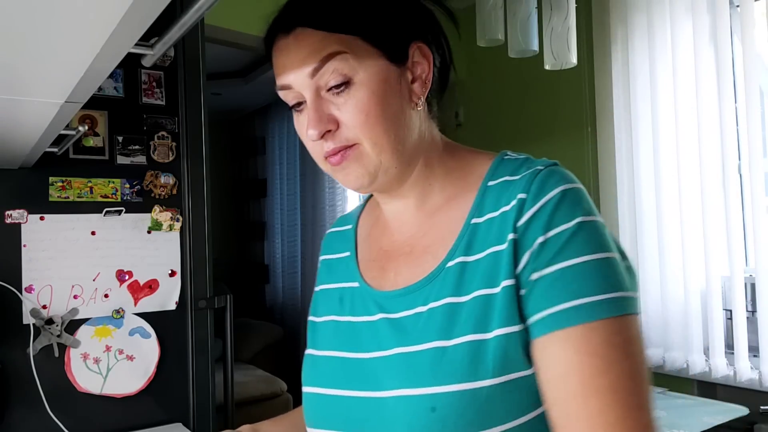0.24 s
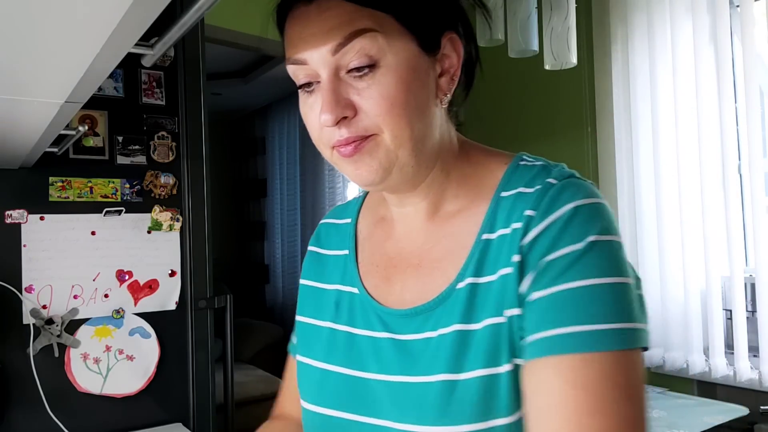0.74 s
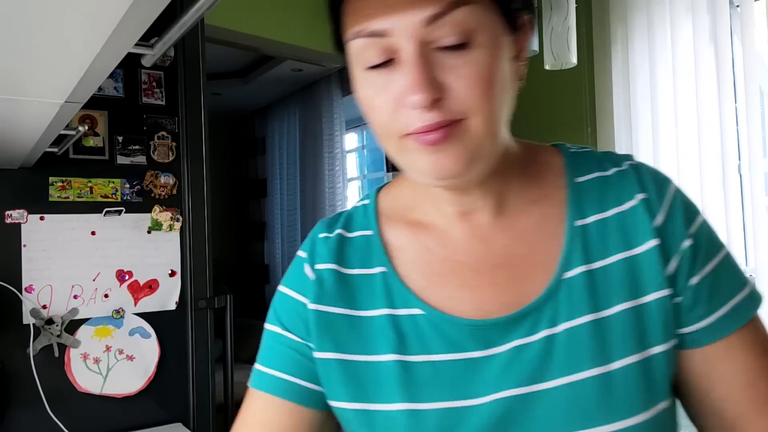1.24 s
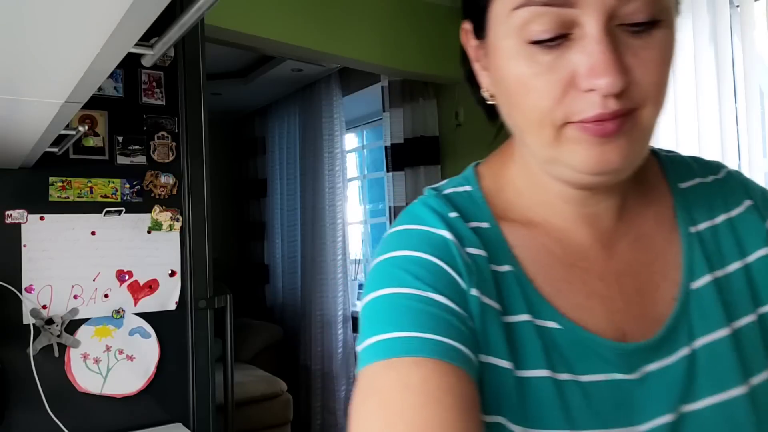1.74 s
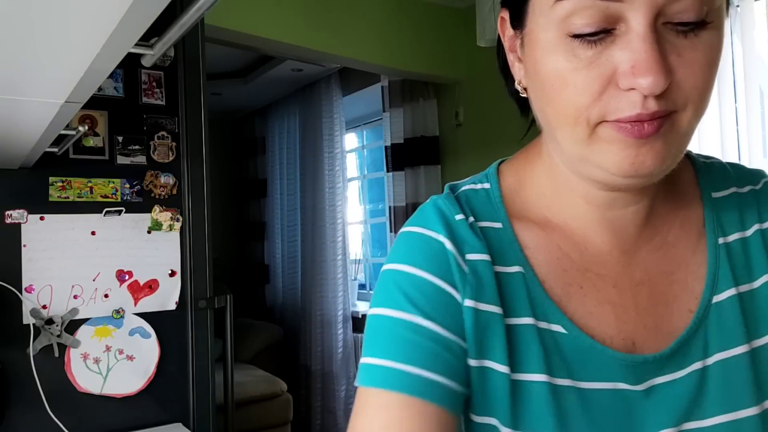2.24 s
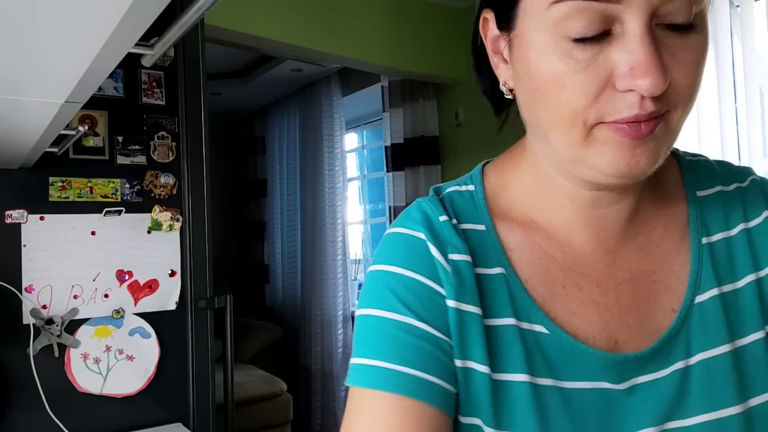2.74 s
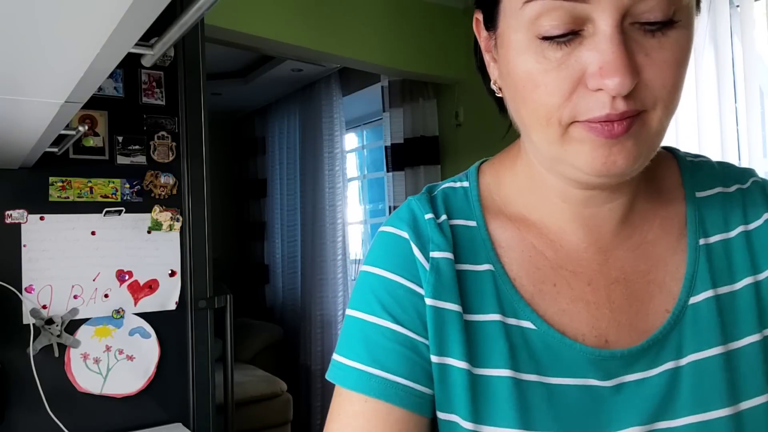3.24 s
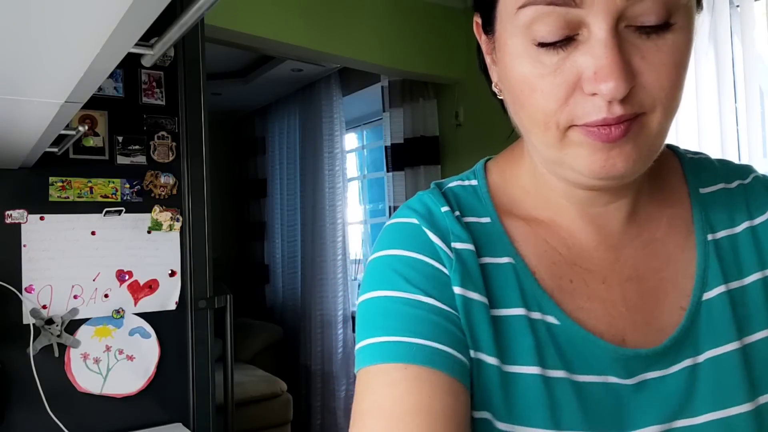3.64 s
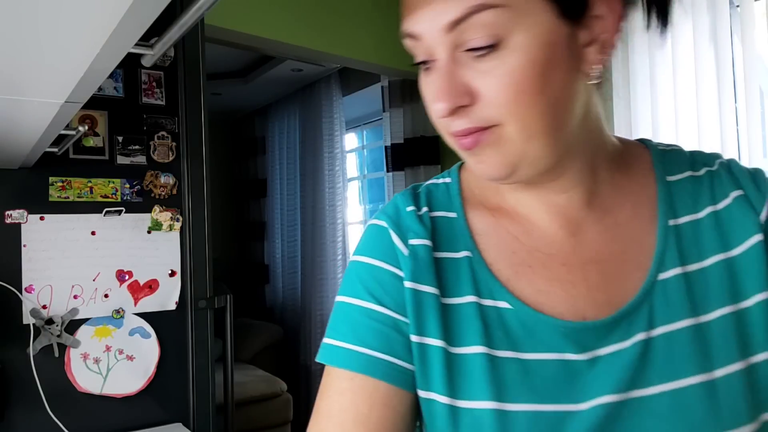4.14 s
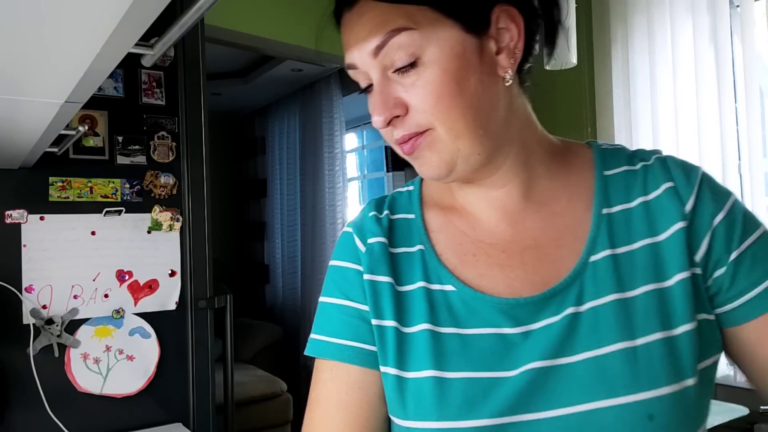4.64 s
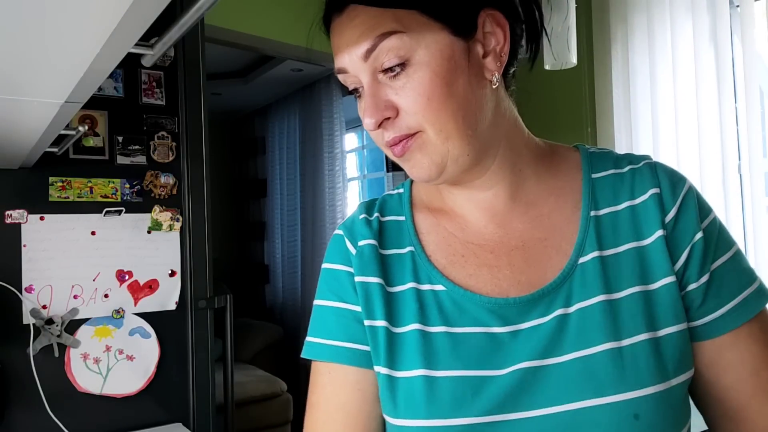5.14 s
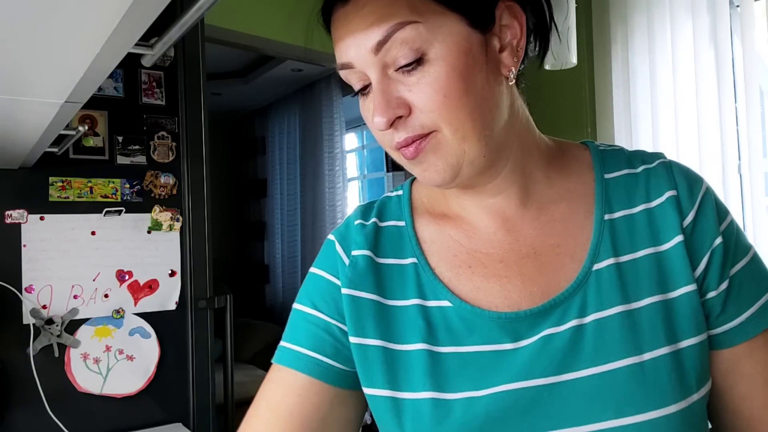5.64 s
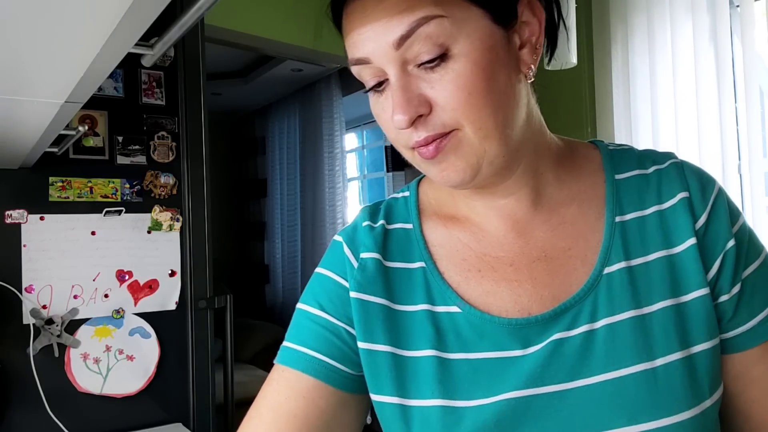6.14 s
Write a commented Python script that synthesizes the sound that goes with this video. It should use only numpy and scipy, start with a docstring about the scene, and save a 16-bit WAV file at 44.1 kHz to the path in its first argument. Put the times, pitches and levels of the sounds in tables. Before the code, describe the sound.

In a small, fairly dry kitchen, close up, soft knocks and brief slides on the worktop come first. A tap lever thumps and water hisses sharply into the sink, with metal clinking in the jet. The tap shuts with a thud, water tips out and drips fade. Cutlery is laid down, then a dish lands and rocks to rest over a faint low hum.

```python
"""In a small kitchen a tap is opened, hisses for two seconds into a sink and onto a held object, and is shut.
The water, spattering in the sink, is noise and random droplets, shaped by resonances, echoes and slow change.
Things slide and bump on the worktop (friction noise, damped modes), metal clinks, cutlery is laid down,
and a dish is put down and rocks. An appliance hums steadily (sines) over the quiet air of the room (noise)."""
import sys
import numpy as np
from scipy import signal
from scipy.fft import rfft, irfft, next_fast_len
from scipy.io import wavfile
from scipy.ndimage import map_coordinates

SR = 44100
rng = np.random.default_rng(int(sys.argv[2]) if len(sys.argv) > 2 else 0)


def generate_wav(sig):
    """Save sig (samples, or channels by samples) to the path in sys.argv[1] as 16-bit PCM at SR."""
    pcm = np.round(np.clip(np.atleast_2d(sig).T, -1, 1) * 32767).astype(np.int16)
    wavfile.write(sys.argv[1], SR, pcm)


N = 281358  # length [samples]


def amp(db):
    """Level law: decibels to amplitude gain."""
    return 10 ** (np.asarray(db) / 20)


def unit(x):
    """Normalisation of the signal power: rms 1."""
    return x / np.sqrt(np.mean(x ** 2) + 1e-20)


def along(points, hz):
    """Interpolation of (frequency [Hz], value) points on a logarithmic frequency axis."""
    f, v = np.transpose(points)
    return np.interp(np.log(hz + 1), np.log(f + 1), v)


def wobble(rate):
    """Slow random modulation: a smooth curve through rate random knots a second."""
    knots = rng.standard_normal(int(N * rate / SR) + 4)
    return map_coordinates(knots, [np.arange(N) * rate / SR])


def sides(pan_db):
    """Interaural level difference: left and right gains, positive to the left."""
    return amp(np.array([np.atleast_1d(pan_db), -np.atleast_1d(pan_db)]) / 2)


def since(s):
    """Elapsed time [s] since time s, 0 before it."""
    return np.maximum(np.arange(N) / SR - s, 0)


def onset(s, rise_s):
    """Smooth transition from 0 to 1 that starts at time s."""
    return 1 - np.exp(-(since(s) / rise_s) ** 2)


def swell(s, rise_s, hold_s, fall_db_per_s):
    """Envelope with exponential decay: rises at time s and dies away from hold_s later."""
    return onset(s, rise_s) * amp(-fall_db_per_s * since(s + hold_s))


def filtered(x, response):
    """Linear filtering: the spectrum of x times a response of frequency."""
    n = x.shape[-1]
    m = next_fast_len(n + 8192)
    return irfft(rfft(x, m) * response(np.fft.rfftfreq(m, 1 / SR)), m)[..., :n]


def band(x, centre_hz, octaves):
    """Band-pass filtering by a bell on the log-frequency axis."""
    return filtered(x, lambda hz: 1 / (1 + (np.log2((hz + 1) / centre_hz) / octaves) ** 4))


def resonant(x, modes):
    """Parallel resonators of (centre [Hz], width [Hz], level [dB]), alternating in sign."""
    def response(f):
        total = 0
        for k, (centre, width, db) in enumerate(modes):
            damping = 1j * f * width
            total = total + (-1) ** k * amp(db) * damping / (centre ** 2 - f ** 2 + damping)
        return total
    return filtered(x, response)


# correlation of the two channels: (frequency [Hz], left-right likeness [0 to 1])
LIKENESS = [(60, 0.92), (300, 1), (640, 0.02), (1400, 0.012), (3100, 0.024), (6800, 0.49), (15000, 1)]


def coloured(pair, spectrum):
    """Partial coherence: two unrelated signals become one stereo sound of rms 1, nearly mono in the bass."""
    turn = lambda hz: np.arccos(np.clip(along(LIKENESS, hz), -1, 1)) / 2
    mid_side = lambda hz: amp(along(spectrum, hz)) * [np.cos(turn(hz)), np.sin(turn(hz))]
    mid, side = filtered(pair, mid_side)
    return unit(np.array([mid + side, mid - side]))


def noise(size=N):
    """Random excitation: two unrelated white noises."""
    return rng.standard_normal((2, size))


def droplets(rate, spread_db, size=N):
    """Poisson-like impacts, rate a second, whose strengths spread randomly."""
    hit = rng.random(size) < rate / SR
    strength = amp(spread_db * np.minimum(rng.exponential(size=size), 4))
    return unit(noise(size) * hit * strength)


def patchy(pair, depth_db, width_hz=260, life=0.045):
    """Time-varying spectrum: random patches, width_hz wide and life [s] long, flare and fade."""
    hz, t, z = signal.stft(pair, SR, nperseg=1024)
    knots = rng.standard_normal((300, 600))
    grid = np.meshgrid(hz / width_hz, t / life, indexing="ij")
    field = map_coordinates(knots, grid, mode="wrap")
    return signal.istft(z * amp(depth_db * field), SR, nperseg=1024)[1][:, :pair.shape[1]]


def add(out, s, sound):
    """Superposition: mix a stereo sound in at time s."""
    i = max(round(s * SR), 0)
    out[:, i:i + sound.shape[1]] += sound[:, :N - i]


# reverberation of the kitchen: (frequency [Hz], t60 [s])
REVERBERATION = [(100, 0.21), (400, 0.28), (1500, 0.27), (8000, 0.23), (15000, 0.05)]


def in_room(x, wet_db):
    """Reverberation: a short sound followed by its own diffuse tail from the kitchen walls."""
    hz, t, z = signal.stft(noise(size=SR // 2), SR, nperseg=256)
    decay = amp(-60 * t / along(REVERBERATION, hz)[:, None])
    tail = signal.istft(z * decay, SR, nperseg=256)[1]
    tail = coloured(tail, [(100, 0), (10000, 0)])
    # the tail starts 4 ms after the direct sound
    tail = np.pad(tail / np.linalg.norm(tail[0]), ((0, 0), (SR // 250, 0)))
    return x + amp(wet_db) * signal.fftconvolve(x, tail, axes=1)[:, :x.shape[1]]


def strikes(rows, modes, rise_cycles, crack_db, crack_hz, crack_t60, wet_db, rattle, crack_octaves=0.88):
    """Modal synthesis: each blow rings damped modes at new strengths and begins with a crack of noise."""
    out, t = np.zeros((2, N)), np.arange(SR // 2) / SR
    hz, level, t60 = np.transpose(modes)[:, :, None]
    for s, db, bright, pan_db in rows:
        gains = amp(level + bright * np.log2(hz / hz.mean()) + rng.normal(0, 1, hz.shape))
        # short waves reach the two microphones out of step
        phase = noise(size=len(hz))[:, :, None] * np.minimum(hz / 2500, 2)
        # loose contact makes the ringing waver, fastest in the high modes
        knots = 4 * np.sqrt(hz) * t
        waver = np.array([map_coordinates(rng.standard_normal(300), [k]) for k in knots])
        phase = phase + rattle * waver
        rise = 1 - np.exp(-(t * hz / rise_cycles) ** 2)
        decay = amp(-60 * t / t60)
        ring = (gains * rise * decay * np.sin(2 * np.pi * hz * t + phase)).sum(1)
        crack = band(noise(size=len(t)) * amp(-60 * t / crack_t60), crack_hz, crack_octaves)
        crack = crack * (1 - np.exp(-(t * crack_hz / rise_cycles) ** 2))
        blow = in_room(ring / abs(ring).max() + amp(crack_db) * crack / abs(crack).max(), wet_db)
        # peak level is set before the left-right gains
        add(out, s, amp(db) * sides(pan_db) * blow / abs(blow).max())
    return out


# partials of the appliance: (frequency [Hz], level before drift and panning [dB rms])
HUM_PARTIALS = [(48.9, -86), (101, -69), (244.8, -48.5), (489.6, -75.5)]


def appliance_hum():
    """Additive synthesis: steady sines whose common timing and level drift slightly."""
    t = np.arange(N) / SR + 0.000092 * wobble(3.3)
    hum = sum(amp(db) * np.sqrt(2) * np.sin(2 * np.pi * hz * t) for hz, db in HUM_PARTIALS)
    return hum * amp(0.33 * wobble(2.83)) * sides(8.5)


# spectrum of the room air: (frequency [Hz], relative level [dB per Hz])
AIR_SPECTRUM = [(20, -10.5), (48, -1), (70, -13.5), (100, -12.5), (200, -13.5), (260, -11.5), (350, -10.5),
                (760, -28), (1500, -34.5), (5800, -39.5), (7200, -31), (8600, -31.5), (10000, -49.5),
                (12500, -56), (14000, -79)]
# stereo lean of the air: (frequency [Hz], left-right difference [dB])
AIR_LEAN = [(50, 3), (200, 5.5), (500, 5.5), (1500, -1), (8000, -1.5)]


def room_air():
    """Stationary broadband noise with a set spectrum and a stereo lean by frequency."""
    air = filtered(coloured(noise(), AIR_SPECTRUM), lambda hz: sides(along(AIR_LEAN, hz)))
    return amp(-55.5) * air


# deep blows on the cabinet: (time [s], peak level [dB], brightness [dB/octave], left-right difference [dB])
THUD_BLOWS = [(0.125, -35.5, -5, 3), (1.75, -36.5, 27, 5), (3.65, -32.5, 17, -3), (3.703, -24, -26, 2),
              (3.735, -28, -14, -1)]
# modes of the cabinet: (frequency [Hz], relative level [dB], t60 [s])
CABINET_MODES = [(44.7, 21, 0.084), (63, 3, 0.2), (85, 16.5, 0.31), (118, -45, 0.075)]


def thuds():
    """Low-frequency modes of the cabinet answer deep thuds."""
    return strikes(THUD_BLOWS, CABINET_MODES, rise_cycles=0.55, crack_db=-7.5, crack_hz=181,
                   crack_t60=0.15, wet_db=-4.5, rattle=1.0)


# soft blows on the counter: (time [s], peak level [dB], brightness [dB/octave], left-right difference [dB])
BUMP_BLOWS = [(0.117, -27.5, 5, 4.5), (0.128, -27.5, -15.5, 10), (0.585, -39, 7, 11), (0.626, -31.5, -3, 7),
              (0.641, -39, -1, 3), (1.066, -41.5, -6, 5), (1.371, -30, -1.5, 5), (4.634, -42.5, -14, 3),
              (4.899, -46.5, -12, 5), (4.935, -49, -12, 4)]
# modes of the counter: (frequency [Hz], relative level [dB], t60 [s])
COUNTER_MODES = [(143, -9.5, 0.038), (286, -4, 0.053), (397, 4, 0.033), (450, -2.5, 0.036),
                 (657, -16, 0.057), (970, -32, 0.037), (1349, -33, 0.055)]


def bumps():
    """Heavily damped plate modes make soft bumps on the counter."""
    return strikes(BUMP_BLOWS, COUNTER_MODES, rise_cycles=0.88, crack_db=-11.5, crack_hz=910,
                   crack_t60=0.036, wet_db=-8.5, rattle=0.56)


# blows on a light hollow thing: (time [s], peak level [dB], brightness [dB/octave], left-right difference [dB])
KNOCK_BLOWS = [(0.0, -36, 2.5, 5), (0.02, -39.5, 2, 5), (4.305, -41.5, 4.5, 13.5), (4.403, -36, -5, 11.5),
               (4.414, -31, -5.5, 0), (4.432, -47, -2, 5), (4.46, -48, 7, 8)]
# its modes, perhaps those of a plastic tub: (frequency [Hz], relative level [dB], t60 [s])
TUB_MODES = [(94, -8.5, 0.054), (351, 3.5, 0.044), (502, -1, 0.043), (642, -6.5, 0.11), (747, -10.5, 0.058),
             (1007, -13.5, 0.067), (1330, -14.5, 0.034), (1690, -24, .025)]


def knocks():
    """Damped modes of a light hollow body, excited by knocks."""
    return strikes(KNOCK_BLOWS, TUB_MODES, rise_cycles=0.33, crack_db=-15.5, crack_hz=1200,
                   crack_t60=0.079, wet_db=-3, rattle=0.53)


# things slid on the worktop: (time [s], rise [s], hold [s], starting level of the rub [dB],
# scrape over rub [dB], fade while sliding [dB/s])
SLIDE_STROKES = [(0.0, 0.0057, 0.061, -72.5, 12, -2), (0.059, 0.026, 0.034, -57, 9, 7),
                 (0.373, 0.062, 0.24, -49.5, 5, 27.5), (1.038, 0.085, 0.18, -43.5, -10, 9),
                 (4.261, 0.012, 0.13, -70, 12.5, 2)]
# spectrum of the fine rub: (frequency [Hz], relative level [dB per Hz])
RUB_SPECTRUM = [(1180, -55), (2000, -32), (4120, -39), (4490, -11), (6880, 5), (8480, 9), (10000, -10.5),
                (15100, -21), (16000, -41.5)]
# spectrum of the coarse scrape: (frequency [Hz], relative level [dB per Hz])
SCRAPE_SPECTRUM = [(400, -6), (700, 0.5), (1500, -3.5), (3000, -2.5), (5500, -2), (8000, 5.5), (11000, -42)]
SLIDE_FALL_DB_PER_S = 203  # once the hold is over, beside the fade


def slides():
    """Dry friction on the worktop: a fine hiss over a coarser scrape of tiny slips, mostly fading."""
    out = np.zeros((2, N))
    for s, rise_s, hold_s, db, scrape_db, fade in SLIDE_STROKES:
        slips = droplets(rate=2900, spread_db=-3.0) + 1.5 * noise()
        rub = coloured(noise(), RUB_SPECTRUM) + amp(scrape_db) * coloured(slips, SCRAPE_SPECTRUM)
        rub = patchy(rub, depth_db=2.5, life=0.038)
        level = amp(db - fade * since(s) + 0.59 * wobble(54.5))
        out += level * swell(s, rise_s, hold_s, SLIDE_FALL_DB_PER_S) * rub
    return out * sides(0.29)


# clinks of metal: (time [s], peak level [dB], brightness [dB/octave], left-right difference [dB])
CLINK_BLOWS = [(2.1855, -11.5, -8, -8.5), (2.3655, -8, 3.5, -7.5), (2.382, -18, 21, -6),
               (3.967, -15.5, 8, -6)]
# modes of the clinking metal: (frequency [Hz], relative level [dB], t60 [s])
BOWL_MODES = [(3650, -17, 0.084), (4780, 2, 0.014), (5530, 1, 0.097), (6220, 9, 0.019), (7144, 1, 0.053),
              (7240, 14.5, 0.08), (7730, 6, 0.049), (9485, -11, 0.042)]


def clinks():
    """High-frequency metal modes ring as clinks."""
    return strikes(CLINK_BLOWS, BOWL_MODES, rise_cycles=1.9, crack_db=-19.5, crack_hz=6560,
                   crack_t60=0.06, wet_db=-7, rattle=0.87)


# cutlery is laid down: (time [s], peak level [dB], brightness [dB/octave], left-right difference [dB])
CUTLERY_BLOWS = [(5.2042, -16, 0, -7), (5.207, -19.5, -6, 4), (5.2115, -23.5, -5, -3)]
# modes of the cutlery: (frequency [Hz], relative level [dB], t60 [s])
CUTLERY_MODES = [(1924, -25.5, .04), (3330, -25, .04), (3600, -26, 0.067), (4630, -14, .08),
                 (5030, -24, .04), (5580, -2, 0.064), (6030, -7, 0.085), (6140, -11, .11), (6580, -9, .04),
                 (7020, -6, 0.063), (7320, 4.5, 0.064), (7670, 8, 0.074), (8120, 3.5, 0.079),
                 (8750, -8, .04), (9440, -1, .06), (10170, -14, .1), (10840, -18, 0.091),
                 (11360, -18, 0.082), (12250, -25, .07), (14600, -27, 0.1)]


def cutlery():
    """Dense high modes of a piece of cutlery, struck as it is laid down."""
    return strikes(CUTLERY_BLOWS, CUTLERY_MODES, rise_cycles=1.4, crack_db=-12.5, crack_hz=6000,
                   crack_t60=0.027, wet_db=-10.5, rattle=0.72, crack_octaves=1.0)


# the dish lands and bounces: (time [s], peak level [dB], brightness [dB/octave], left-right difference [dB])
LANDING_BLOWS = [(5.922, -12, 5, -8.5), (5.9245, -8, -4, 8), (5.931, -18, 9.5, -2), (5.967, -16.5, -6, 4),
                 (5.985, -24, -8, 7)]
# modes of the dish: (frequency [Hz], relative level [dB], t60 [s])
DISH_MODES = [(164, -21, 0.3), (223, -20, 0.31), (314.6, -9, 0.29), (393, 12, 0.025), (420, -9.5, 0.22),
              (466, 5.5, 0.039), (671, -10.5, 0.14), (850, -4, 0.04), (1024, 2.5, 0.077),
              (1196, 1.5, 0.027), (1320, 6, 0.035), (1470, -6, 0.028), (1700, -21, 0.021),
              (2060, -30, 0.028), (2760, -34, 0.04), (3680, -52, 0.04), (4570, -52, 0.031), (5350, -34, .1),
              (5880, -27, 0.077), (6470, -41, .025), (6920, -27, 0.032), (7600, -24, .07),
              (8080, -30, 0.071)]


def dish_landing():
    """Repeated impacts excite the dish's modes as it lands and bounces."""
    return strikes(LANDING_BLOWS, DISH_MODES, rise_cycles=0.73, crack_db=-15, crack_hz=1500,
                   crack_t60=0.05, wet_db=-12, rattle=0.9, crack_octaves=1.25)


# the rim rocks and settles: (time [s], peak level [dB], brightness [dB/octave], left-right difference [dB])
ROCKING_BLOWS = [(6.127, -38, -3, 4), (6.15, -22, -3, -6), (6.161, -18, 2, 8), (6.166, -25, -1, 0),
                 (6.178, -20, 3, 0), (6.183, -20, 3, 2), (6.188, -26, 1, -2), (6.2, -28, -2, -3)]
# modes of the rim: (frequency [Hz], relative level [dB], t60 [s])
RIM_MODES = [(194, -14, 0.27), (323, 9, 0.055), (411, 6, 0.055), (449, 12.5, 0.041), (617, -6.5, .04),
             (753, -15.5, 0.23), (1021, -5, 0.18), (1130, -15, .08), (1323, -2, 0.076), (1560, -10, .04),
             (1724, -15, 0.098), (1900, -21, 0.034), (2140, -14.5, 0.13), (2350, -21, 0.03),
             (3320, -34, 0.06), (3720, -38, .05), (5480, -27, 0.066), (7300, -33, 0.045),
             (7680, -28, 0.054)]


def dish_rocking():
    """Rapid rim contacts excite modes while the dish rocks and settles."""
    return strikes(ROCKING_BLOWS, RIM_MODES, rise_cycles=0.67, crack_db=-11, crack_hz=1100,
                   crack_t60=0.07, wet_db=-11, rattle=0.85, crack_octaves=0.9)


# the lever is raised and lowered:
# (time [s], peak level [dB], brightness [dB/octave], left-right difference [dB])
LEVER_BLOWS = [(1.685, -31.5, -11, 4), (1.694, -49, 22, 10), (1.755, -30, 1, 8), (1.772, -29, 0, 5),
               (1.895, -27.5, 0.5, 6.5), (3.608, -35, 3.5, 6), (3.693, -26.5, -2, 6)]
# modes of the tap body: (frequency [Hz], relative level [dB], t60 [s])
TAP_MODES = [(77, -1.5, 0.11), (193, -17, 0.025), (207, 2, 0.13), (453, -15, 0.1), (733, -17.5, 0.078),
             (970, -24, 0.082)]


def lever():
    """Structure-borne modes of the tap body, knocked by its lever."""
    return strikes(LEVER_BLOWS, TAP_MODES, rise_cycles=0.8, crack_db=-23, crack_hz=800,
                   crack_t60=0.06, wet_db=-12, rattle=0.3)


# faint drips: first possible time, span, level at the start and its fade
DRIP_START_S, DRIP_SPAN_S, DRIP_DB, DRIP_FADE_DB_PER_S = 3, 1.7, -38.5, 7.5
DRIP_HZ, DRIP_PAN_DB = 7470, -11  # middle pitch, left-right difference


def drips(count):
    """Random point process: rows for faint drips that crowd closer together and soften."""
    when, size, pitch = rng.random((count, 3)).T
    late = DRIP_SPAN_S * ((np.arange(count) + when) / count) ** 0.38
    db = DRIP_DB - DRIP_FADE_DB_PER_S * late + 6 * (size - .5)
    hz = DRIP_HZ * 2 ** (0.43 * (pitch - .5))
    return [(DRIP_START_S + s, d, f, DRIP_PAN_DB) for s, d, f in zip(late, db, hz)]


# small ticks and the largest drips: (time [s], peak level [dB], centre [Hz], left-right difference [dB])
TICK_BLOWS = [(0.0847, -26.5, 8030, -1), (0.104, -27.5, 7940, 3), (0.4372, -22, 8000, 7.5),
              (4.046, -21, 7300, -3), (4.255, -55, 4053, -7), (4.3, -50, 2926, -10), (4.37, -46, 5300, -11),
              (4.456, -39, 8300, 5), (4.557, -34, 8350, 1), (4.56, -54, 5640, -7), (4.66, -34.5, 7900, -4),
              (4.813, -53, 2780, -6), (4.889, -48.5, 7400, -11), (4.893, -52, 5300, -1),
              (4.918, -49, 6940, -9), (6.0986, -37.5, 7330, -0.5)]
TICK_RISE_S = 0.0004


def ticks():
    """Impulsive excitation: single bright ticks and drips as short decaying noise bands."""
    out, t = np.zeros((2, N)), np.arange(SR // 4) / SR
    for s, db, centre_hz, pan_db in list(TICK_BLOWS) + drips(count=14):
        snap = noise(size=len(t)) * amp(-60 * t / 0.028)
        tick = in_room(band(snap, centre_hz, 0.18) + amp(-19.0) * band(snap, 3500, 1.0), wet_db=-9.5)
        crack = band(noise(size=len(t)) * amp(-60 * t / .008), 6000, 0.9)
        tick = (tick + amp(-11) * crack) * (1 - np.exp(-(t / TICK_RISE_S) ** 2))
        add(out, s, amp(db) * sides(pan_db) * tick / abs(tick).max())
    return out


GUSH_RISE_S = 0.021  # shared by the draining water and the gushes
DRAIN_S, DRAIN_HOLD_S, DRAIN_DB, DRAIN_FADE_DB_PER_S = 3.3, 0.4, -49, 38  # level before flutter


def draining():
    """Superposed tiny impacts: the fine crackle of water draining away."""
    crackle = droplets(rate=900, spread_db=1.5) + noise()
    spectrum = [(800, -7.5), (2800, -8.0), (5500, -11.0), (6800, -17.0), (8400, 4.5), (10000, -9.0),
                (15000, -20)]
    level = swell(DRAIN_S, GUSH_RISE_S, DRAIN_HOLD_S, DRAIN_FADE_DB_PER_S)
    return level * amp(DRAIN_DB + 5.9 * wobble(28.0)) * coloured(crackle, spectrum)


# a wide bright hiss as the jet starts, then spatters in the sink during the jet, after it shuts and in
# the gushes: (time [s], level [dB], centre [Hz], half width [octaves], length [s], left-right difference [dB])
SPATTER_CLOUDS = [(1.922, -46, 7300, 0.55, 0.27, -8), (2.36, -40, 3690, 0.023, .03, -8),
                  (2.395, -44.5, 2290, .18, 0.055, 0), (2.437, -36.5, 4770, 0.091, 0.025, -4),
                  (2.438, -39.5, 2860, 0.19, 0.027, -3), (2.525, -46.5, 4570, .15, 0.033, -7),
                  (2.6, -44, 2920, 0.23, 0.038, 0), (2.673, -39.5, 3270, 0.12, 0.038, 2),
                  (2.68, -43, 1175, 0.29, 0.056, 2), (2.743, -43, 3570, 0.31, .035, -1),
                  (2.813, -33.5, 3300, 0.58, 0.027, -1.5), (2.816, -40, 1060, 0.83, 0.047, 1.5),
                  (2.869, -43, 3410, .08, 0.02, -5), (2.977, -51.5, 3960, 0.13, 0.067, -12),
                  (3.002, -53, 3300, .08, 0.023, 2), (3.161, -47, 3830, .08, 0.022, -6),
                  (3.351, -37, 2850, 0.073, 0.039, 0), (3.355, -24.5, 7130, .05, 0.024, -14.5),
                  (3.607, -45.5, 4150, 0.31, 0.045, -7), (3.693, -57, 4030, .4, 0.028, -6),
                  (3.694, -37.5, 8300, 0.098, 0.05, 4.5), (3.774, -53.5, 4400, 0.65, 0.025, -6),
                  (3.879, -32.5, 7400, 0.52, 0.043, -1), (3.89, -35, 2980, 0.27, 0.03, -2),
                  (3.963, -31.5, 6420, 0.38, 0.044, -8), (3.968, -29.5, 1450, 0.29, 0.02, -1.5),
                  (3.972, -39, 3200, 0.52, 0.066, -1.5)]


def spatters():
    """Band-limited droplet clouds: water spatters in the sink; narrow bands gurgle at one pitch."""
    out, t = np.zeros((2, N)), np.arange(SR // 3) / SR
    for s, db, centre_hz, octaves, length, pan_db in SPATTER_CLOUDS:
        u = 3 * t / length
        cloud = unit(band(droplets(rate=3000, spread_db=-5.5, size=len(t)), centre_hz, octaves))
        # each cloud swells and dies
        add(out, s, amp(db) * sides(pan_db) * in_room(cloud * u * np.exp(1 - u), wet_db=-9.5))
    return out


# spectrum of the valve's plain hiss: (frequency [Hz], relative level [dB per Hz])
VALVE_SPECTRUM = [(400, -7.5), (900, -9.5), (1500, -18.5), (2100, -27), (2800, -18), (3500, -23),
                  (4200, -17), (5200, -24.5), (8000, -18), (11000, -50)]
# resonances of the spout: (centre [Hz], width [Hz], relative level [dB])
SPOUT_RESONANCES = [(1710, 89, -5.5), (2440, 110, -4.5), (2610, 150, -2.5), (2980, 71, -3.5),
                    (3940, 180, -5.5), (4500, 180, -11), (7300, 280, -19.5)]
PIPE_DB = -2.5  # the resonances over the plain hiss
# the valve opens; its hiss fades as the spout fills
OPEN_S, VALVE_DB, VALVE_RISE_S, VALVE_FADE_DB_PER_S = 1.674, -51, 0.012, 20


def spout():
    """Turbulent flow noise through the valve, with the pipe resonances of the spout."""
    level = amp(VALVE_DB + 1.2 * wobble(40)) * swell(OPEN_S, VALVE_RISE_S, 0, VALVE_FADE_DB_PER_S)
    pipe = unit(resonant(noise(), SPOUT_RESONANCES))
    hiss = coloured(noise(), VALVE_SPECTRUM) + amp(PIPE_DB) * pipe
    return level * patchy(hiss, depth_db=1.5, life=0.06)


def bubbles(rate, low_hz, high_hz, t60, spread_db):
    """Bubble resonance: short pings at random moments and pitches, each rising a little as it dies."""
    t = np.arange(SR // 25) / SR
    when, pitch, size, left, right = rng.random((int(rate * N / SR), 5)).T[:, :, None]
    hz = low_hz * (high_hz / low_hz) ** pitch
    strength_db = -spread_db * np.log(size + .03)
    life = amp(strength_db - 60 * t / t60) * (1 - np.exp(-t / .001))
    phase = 2 * np.pi * hz * t * (1 + 0.47 * t)
    index = ((when * N).astype(int) + np.arange(len(t))).ravel()
    pings = [(life * np.sin(phase + 2 * np.pi * turn)).ravel() for turn in (left, right)]
    return unit(np.array([np.bincount(index, ping, N)[:N] for ping in pings]))


def in_basin(pair, echo_db, t60):
    """Comb filtering: quick reflections between the steel walls carve steady narrow bands."""
    t = np.arange(SR // 25) / SR
    echoes = noise(size=len(t)) * amp(-60 * t / t60)
    echoes = amp(echo_db) * echoes / np.linalg.norm(echoes, axis=1, keepdims=True)
    return unit(pair + signal.fftconvolve(pair, echoes, axes=1)[:, :N])


BIG_DROPS_PER_S, BIG_DROP_DB = 50, -4  # heavier drops: how many, and their level over the fine splash


def patter():
    """Impact sound of heavier drops on the sink: random short slaps, each with a pitch of its own."""
    out, t = np.zeros((2, N)), np.arange(SR // 30) / SR
    for when, pitch, size, pan in rng.random((int(BIG_DROPS_PER_S * N / SR), 4)):
        hz = 2300 * 2 ** (1.4 * pitch)
        tone = np.sin(2 * np.pi * hz * t) * amp(-60 * t / .01)
        slap = tone + .7 * noise(size=len(t)) * amp(-60 * t / .022)
        slap = slap * (1 - np.exp(-t / TICK_RISE_S))
        add(out, when * N / SR, amp(14 * size) * sides(12 * (pan - .6)) * slap)
    return in_basin(band(out, 4000, 1.2), echo_db=-3, t60=.06)


# spectrum of the drumming on the basin: (frequency [Hz], relative level [dB per Hz])
BASIN_SPECTRUM = [(30, -24), (60, -10), (95, 7.5), (130, -2.5), (200, 5.5), (330, 2.5), (480, -15),
                  (700, -19), (1500, -47)]


def drumming():
    """Low-frequency forced vibration: water drums on the basin."""
    impacts = droplets(rate=350, spread_db=-1) + .5 * noise()
    return amp(2.8 * wobble(26.93)) * coloured(impacts, BASIN_SPECTRUM) * sides(4.4)


# resonances of the sink bowl: (centre [Hz], width [Hz], relative level [dB])
SINK_RESONANCES = [(1013, 14.5, 10), (1295, 530, -11.5), (2325, 52, -15), (2945, 193, -21), (3300, 45, -10),
                   (3640, 19, 4), (4290, 45, 2), (4620, 230, -6)]
# spectrum of the splash: (frequency [Hz], relative level [dB per Hz])
SPLASH_SPECTRUM = [(400, -18), (600, 11), (800, -2), (1020, 14), (1400, 17), (1700, 2), (2000, -31),
                   (2600, -8.5), (4500, 9), (7000, 6.5), (10000, 12), (15000, -4)]


def splash():
    """Droplet impacts and bubble pings excite the resonances and echoes of the bowl."""
    pings = bubbles(rate=200, low_hz=2500, high_hz=6000, t60=.05, spread_db=2.5)
    drops = droplets(rate=700, spread_db=-1.5) + 0.96 * noise() + .5 * pings
    drops = patchy(drops, depth_db=2.5, width_hz=230.0)
    ringing = unit(resonant(drops, SINK_RESONANCES))
    echoing = in_basin(coloured(drops, SPLASH_SPECTRUM), echo_db=11.5, t60=0.0044)
    bowl = amp(-4.5) * ringing + amp(-2.5) * echoing
    return amp(2.8 * wobble(29.83)) * unit(unit(bowl) + amp(BIG_DROP_DB) * patter())


# narrow resonances of the aerator: (centre [Hz], width [Hz], relative level [dB])
AERATOR_RESONANCES = [(5353, 113, -16.5), (6200, 28, -16.5), (6603, 52, -2.5), (6810, 72, -2),
                      (7190, 73, -4), (7220, 39, -6), (7260, 150, -8.5), (7860, 69, -0.5), (8496, 234, -5),
                      (9065, 128, -3), (9850, 85, 3)]
# spectrum of the jet: (frequency [Hz], relative level [dB per Hz])
JET_SPECTRUM = [(3000, -14), (5000, -16), (6300, 5.5), (6600, -6.5), (7500, 15), (9100, -1.5), (9500, -26),
                (10700, -15), (12500, -11), (15700, -19)]
# stereo lean of the hiss: (frequency [Hz], left-right difference [dB])
JET_LEAN = [(4000, 4.5), (7200, -12), (8200, 8.5), (9000, 7.5), (12000, 3)]


def aerated_jet():
    """Two-phase flow noise: the jet fizzes in the aerator's narrow resonances and the basin's echoes."""
    fizz = lambda: droplets(rate=2500, spread_db=0.5) + noise()
    spectrum = [(3000, -56), (5200, 4.0), (6350, -6.0), (6550, 1.5), (9150, -1.0), (9500, -15.5),
                (10500, -24.0)]
    whistle = unit(resonant(coloured(fizz(), spectrum), AERATOR_RESONANCES))
    jet = whistle + amp(-3.5) * in_basin(coloured(fizz(), JET_SPECTRUM), echo_db=-1.0, t60=0.12)
    jet = patchy(jet, depth_db=4.5, width_hz=70, life=.06)
    jet = patchy(jet, depth_db=2.5, width_hz=443.5)
    jet = unit(filtered(jet, lambda hz: sides(along(JET_LEAN, hz))))
    return amp(0.28 * wobble(45)) * jet


# held water is tipped into the sink: (time [s], hold [s], fizz level [dB], splash level [dB],
# drumming level [dB])
GUSH_EVENTS = [(3.861, 0.036, -22, -42, -37.5), (3.936, 0.05, -31.5, -34.5, -41.5)]
GUSH_FALL_DB_PER_S = 239
OUTLET_S, HELD_S, SHUT_S = 1.897, 2.17, 3.626  # water leaves the spout, object enters the jet, valve shuts
JET_RISE_S, DRIBBLE_FADE_DB_PER_S = 0.14, 51.5  # the jet builds up; once shut it fades as a dribble
HISS_DB, SPLASH_DB, DRUM_DB = -28, -49, -45.5  # free jet, before flutter
HELD_HISS_DB, HELD_SPLASH_DB = 1.5, 2  # added from the moment the object enters the jet
SHUT_DROP_DB = 9.5  # extra drop of the hiss at the shut valve
HISS_PAN_DB, HELD_PAN_DB = -0.5, -3.5  # left-right: free jet, shift from the object's entry to the shutting


def water_levels():
    """Source strength follows the flow: gains of hiss, splash and drumming, and the hiss's pan [dB]."""
    shut = onset(SHUT_S, rise_s=0.011)
    held = onset(HELD_S, rise_s=0.033)
    flow = swell(OUTLET_S, JET_RISE_S, SHUT_S - OUTLET_S, DRIBBLE_FADE_DB_PER_S)
    hiss = flow * amp(HISS_DB + HELD_HISS_DB * held - SHUT_DROP_DB * shut)
    splash_gain = flow * amp(SPLASH_DB + HELD_SPLASH_DB * held)
    drum = flow * amp(DRUM_DB)
    gushes = sum(amp(dbs)[:, None] * swell(s, GUSH_RISE_S, hold_s, GUSH_FALL_DB_PER_S)
                 for s, hold_s, *dbs in GUSH_EVENTS)
    pan_db = HISS_PAN_DB + HELD_PAN_DB * (held - shut)
    # unrelated sounds add in power
    return *np.hypot([hiss, splash_gain, drum], gushes), pan_db


def tap():
    """Superposition of three flow-driven sources: jet hiss, splash and basin drumming."""
    hiss_gain, splash_gain, drum_gain, pan_db = water_levels()
    hiss = hiss_gain * sides(pan_db) * aerated_jet()
    return hiss + splash_gain * splash() + drum_gain * drumming()


def scene():
    """Linear superposition of the room, the handling noises and the water."""
    background = appliance_hum() + room_air()
    handling = thuds() + bumps() + knocks() + slides() + clinks() + cutlery()
    handling = handling + dish_landing() + dish_rocking() + lever()
    water = ticks() + draining() + spatters() + spout() + tap()
    return background + handling + water


LOW_CUT_HZ, TOP_HZ = 24.6, 15750


def record(dry):
    """Band limitation: the microphone loses the deepest bass and all above its upper limit."""
    low_cut = lambda hz: 1 - 1 / (1 + (hz / LOW_CUT_HZ) ** 6)
    top_cut = lambda hz: np.clip((TOP_HZ - hz) / 500 + .5, 0, 1)
    return filtered(dry, lambda hz: low_cut(hz) * top_cut(hz))


dry = scene()
out = record(dry)
generate_wav(out)
```